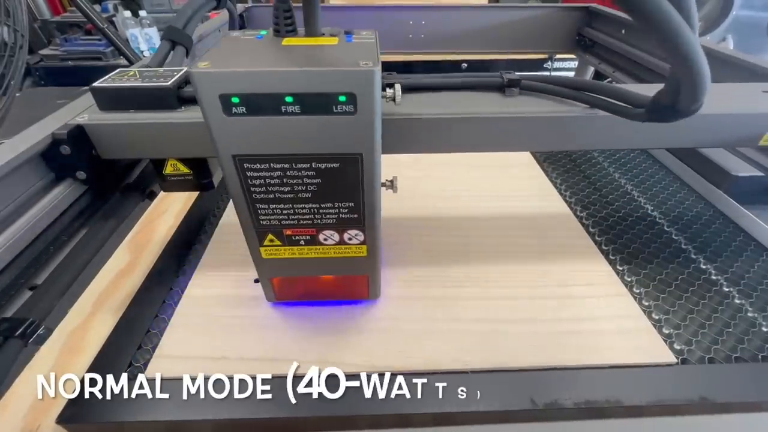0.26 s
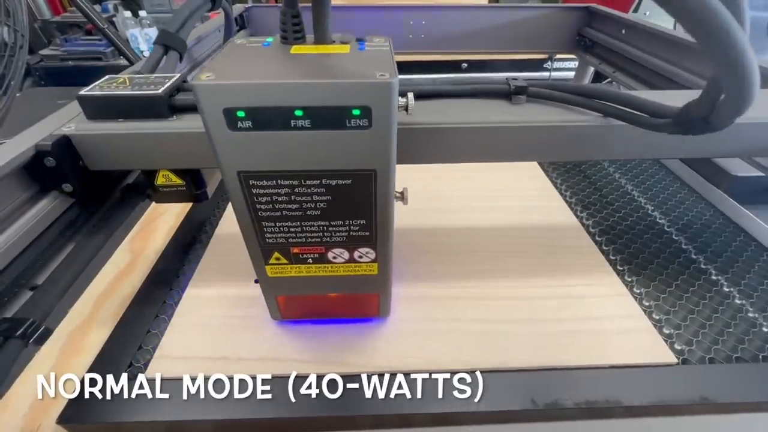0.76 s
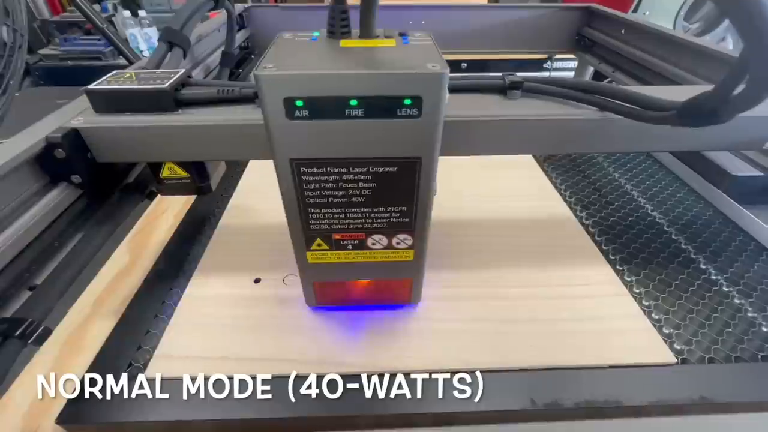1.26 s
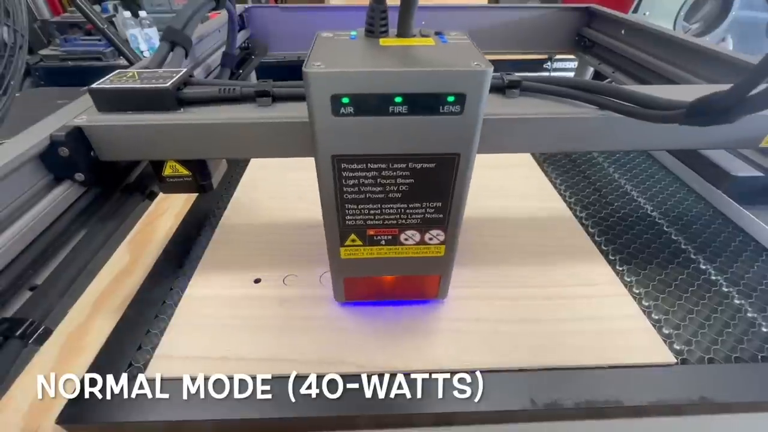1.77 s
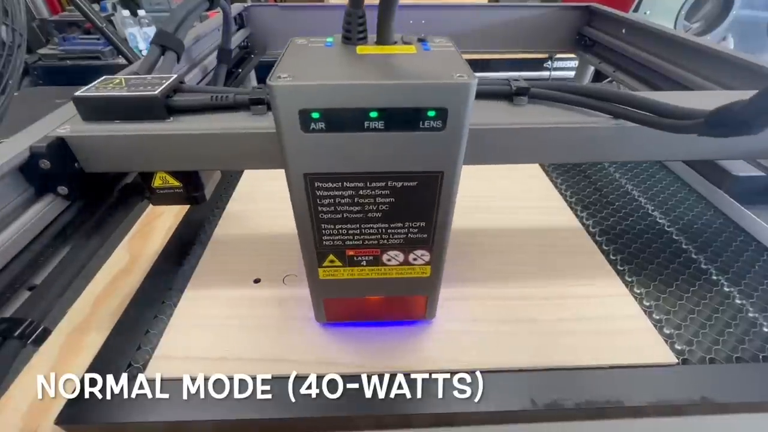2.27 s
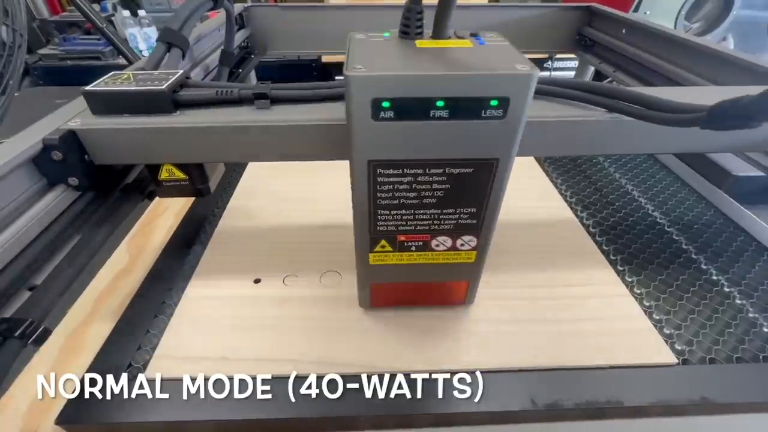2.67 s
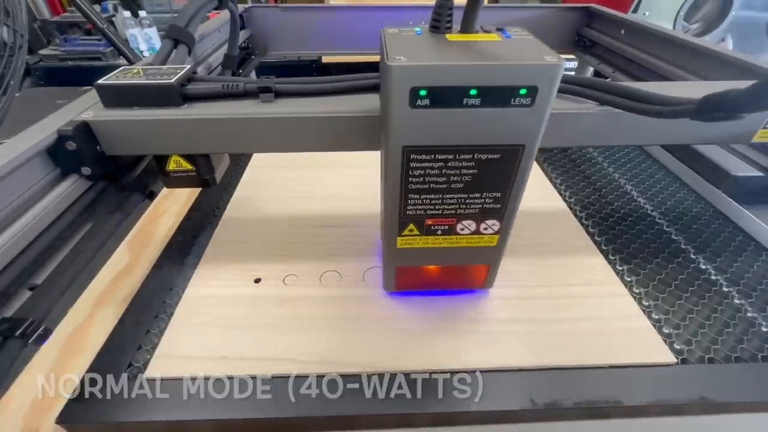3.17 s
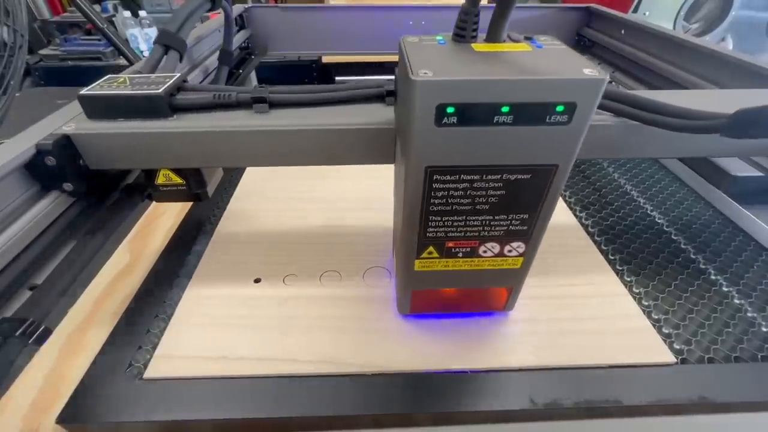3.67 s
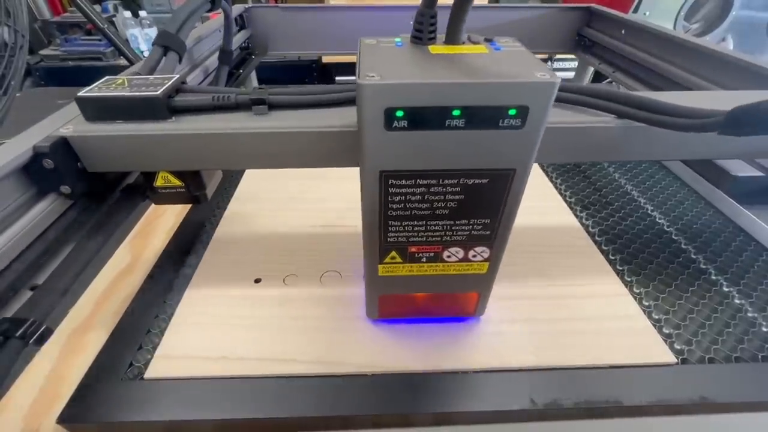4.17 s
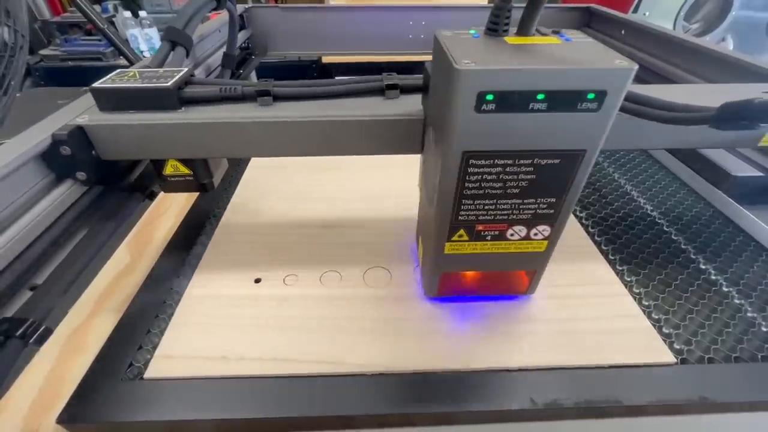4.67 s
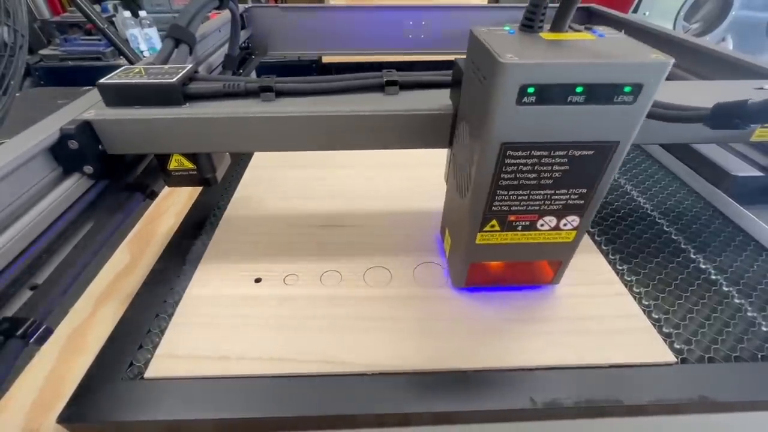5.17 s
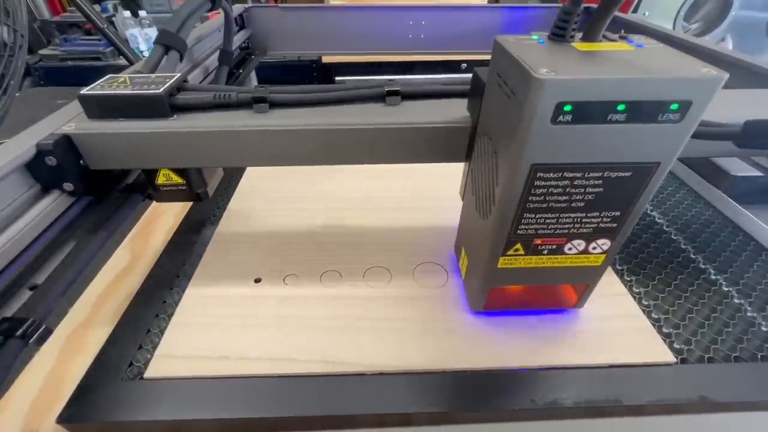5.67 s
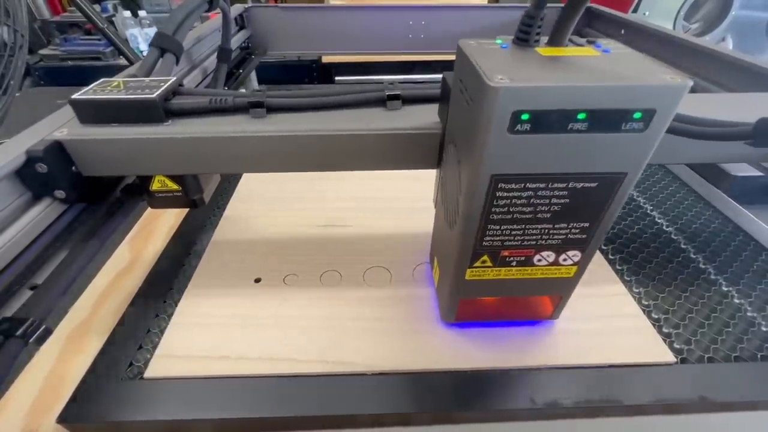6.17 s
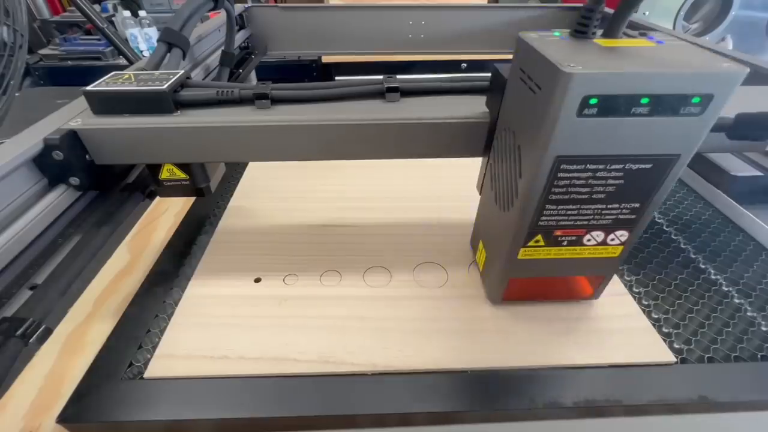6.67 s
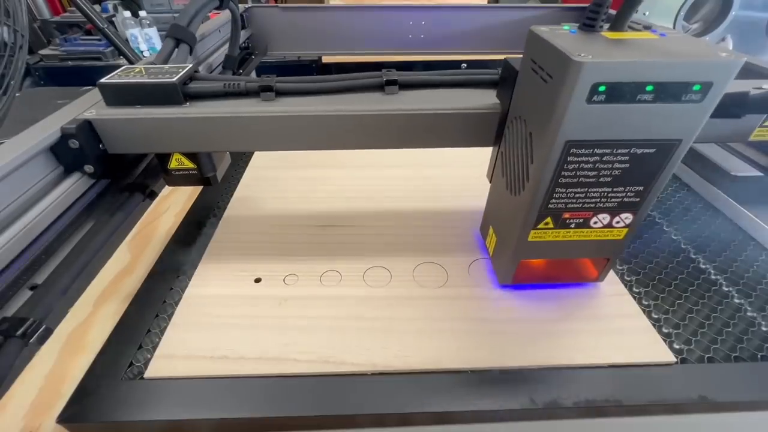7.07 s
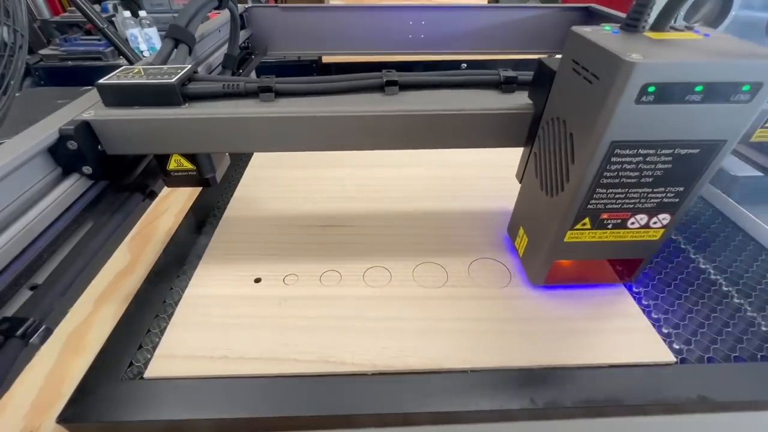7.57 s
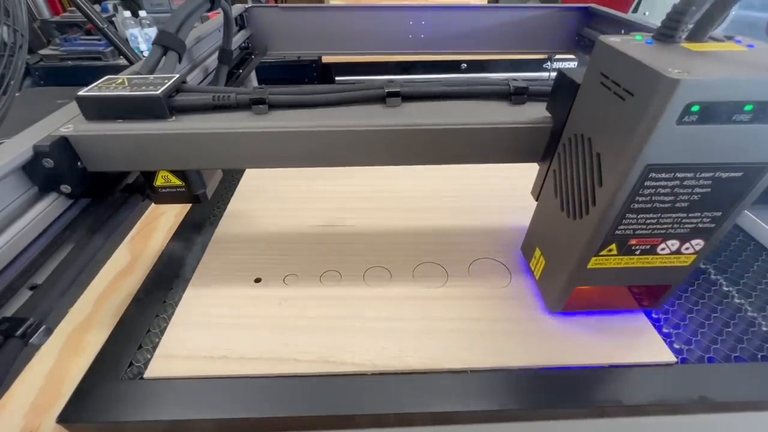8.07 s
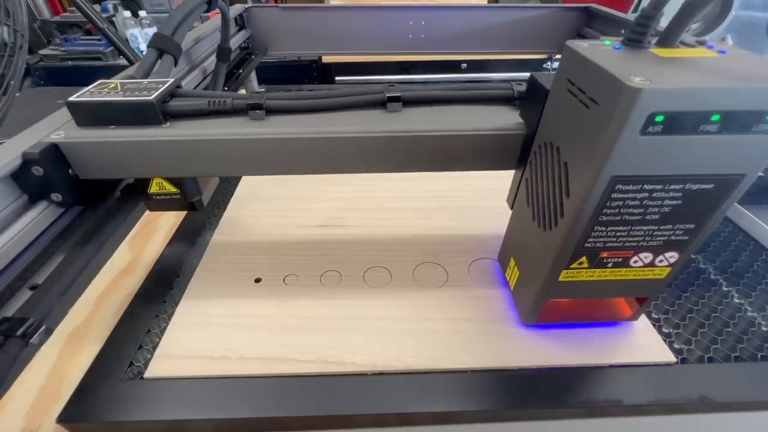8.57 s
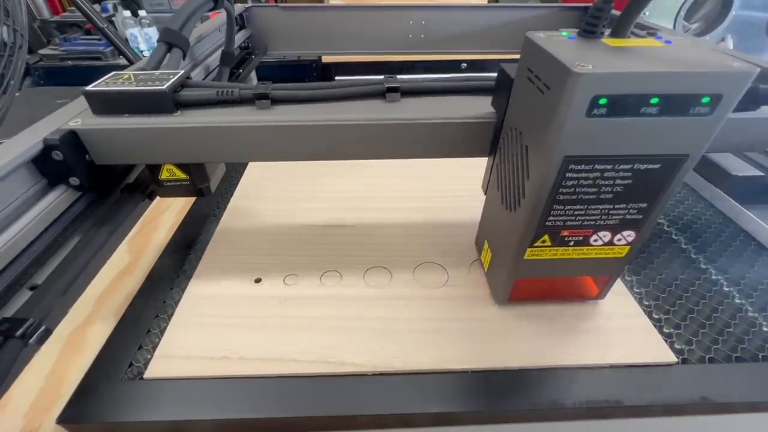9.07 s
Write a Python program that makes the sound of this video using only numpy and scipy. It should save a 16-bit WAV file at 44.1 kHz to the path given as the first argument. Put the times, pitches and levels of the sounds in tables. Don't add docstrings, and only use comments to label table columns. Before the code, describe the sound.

An air nozzle hisses continuously while small cooling fans sing a faint, very high whine that slips upward for a moment at each pause. Fluttering air rumbles and crackles unevenly against the near microphone ports, with sharper puffs clustered around one and a half seconds and scattered later. A weak extractor tone sits far behind in the room. The whine shifts from left toward right and thins out as the head travels.

```python
import sys
import numpy as np
from scipy import signal
from scipy.fft import rfft, irfft, next_fast_len
from scipy.io import wavfile

SR = 44100
rng = np.random.default_rng(int(sys.argv[2]) if len(sys.argv) > 2 else 0)


def materialize(psi):
    bounded = np.clip(np.atleast_2d(psi).T, -1, 1)
    quanta = np.round(bounded * 32767).astype(np.int16)
    wavfile.write(sys.argv[1], SR, quanta)


def volts_from_db(level):
    exponent = np.asarray(level, float) / 20
    return 10 ** exponent


N = 411012

# (time [s], travel [0-1])
HEAD_TRAVEL = [(0, 0), (1.1, .05), (2.5, .25), (3, .5), (4.5, .7), (5.3, .9), (7, .95), (9.32, 1)]
# (start [s], length [s])
BEAM_RESTS = [
    (-.3, .32),
    (1.06, .14),
    (2.55, .13),
    (4.38, .13),
    (6.51, .19),
    (9.05, .4),
]

# (time [s], frequency [Hz])
EXTRACTOR_SPEED = [(0, 1098), (1.2, 1106), (5, 1104), (6.3, 1096), (7.2, 1101), (9.32, 1096)]
# (multiple of blade rate [1], level [dB])
EXTRACTOR_ORDERS = [(.5, -3.5), (1, 2), (1.501, -9.5), (1.75, -12), (2, -13.5), (2.501, -13)]
# (centre [s], change [dB], half length [s])
EXTRACTOR_FADES = [(.25, -4, 0.17), (1.95, -3, 0.58), (5.17, -14, 0.076), (6.1, -13, 0.074),
                   (6.6, -17, 0.089), (9.0, -20, 0.016), (9.3, -10, .08)]

# (frequency [Hz], left [dB per Hz], right [dB per Hz], likeness [0-1], right phase [rad])
HISS_SPECTRUM = [(272, -7, 2, 0.15, 11), (1590, -30, -9.5, 0.15, 8), (2470, -14.5, -13, 1, -12),
                 (3700, -6, -1.5, 0.069, 14), (4500, 6, 7, 0.16, 0.5), (5760, -2, 1.5, 0.2, 7.5),
                 (6520, 11.5, 11, 0.2, -5.5), (6780, 6.5, 7, 0.59, -6.5), (7900, 2, 5.5, .2, 2.4),
                 (9400, 1, 2, .1, 1), (9900, 0, 4, .2, 3), (12100, 5, 2.5, 0.31, 3.5),
                 (12000, -1, 7, .7, 2.5)]
FINE_HISS_SPECTRUM = [(11800, -8, -8, .6, 3.3), (12300, -3, -3, .75, 3.2), (13100, 2, 2, .3, 3.8),
                      (13900, -3, -3, .3, 3.2), (14700, -1, -1, .1, 4.5), (16000, 0, 0, .05, 6.3)]
# (time [s], level [dB])
JET_STRENGTH = [(0, .5), (1.2, 0), (1.8, -0.6), (2.4, -0.9), (3, -0.5), (4.2, -1), (4.8, -0.1), (6, -.3),
                (7.2, -0.3), (8.4, 0.1), (9.32, -0.4)]
BODY_CENTRE_DB, BODY_WIDTH_DB = (-57.5, -55.5), (-57, -58)
FINE_CENTRE_DB, FINE_WIDTH_DB = (-64, -63), (-66, -64)
SHADE_DB = (-6, 1.5)

# (time [s], strength [dB], edge-vortex share [dB])
DRAUGHT_STRENGTH = [(0, -45.5, -10.5), (1, -47, -17), (1.25, -46.5, -7), (1.55, -51.5, -6),
                    (1.75, -45.5, -17), (2.1, -47, -7), (2.35, -48.5, -12), (2.9, -46, -10.5),
                    (4.1, -48, -12), (4.55, -46.5, -13), (5.3, -47, -12), (6.2, -48, -5.5), (6.5, -48, -6),
                    (7.03, -46.5, -11.5), (7.6, -47.5, -7.5), (7.8, -46.5, -17), (8.2, -50, -10.5),
                    (9.32, -46.5, -7)]
# (centre [s], change [dB], half length [s])
LULLS = [(1.37, -12, 0.039), (1.46, -9.5, 0.014), (2.93, -9.5, 0.013), (2.96, 0.5, 0.013), (4.18, 3, 0.07),
         (5.29, -5.5, 0.019), (5.35, 1.5, 0.036), (6.02, -5, 0.024), (6.05, 6.5, 0.014), (6.28, -4, 0.1),
         (6.65, -11.5, 0.048), (6.78, -4.5, 0.2), (8.33, 5, 0.032), (8.9, -7, 0.013), (8.99, -8.5, 0.029),
         (9.14, -3.5, 0.017), (9.24, -2, 0.036)]
# (centre [s], change [dB], half length [s])
VORTEX_CALMS = [(1.37, -24, .11), (2.35, -7, .15), (3.4, -4, .2), (5.42, -8, .08), (5.7, -8, .12),
                (6.15, -7, .12), (6.8, -7, .15), (7.52, -6, .1), (8.25, -7, .08), (8.65, -4, .15),
                (9.15, -8, .05)]
# (time [s], peak [dB], brightness [dB])
SLAPS = [(0.057, -29, -21), (0.256, -34, 7), (0.298, -35, -6), (0.891, -29, -5), (1.218, -27, -8),
         (1.387, -19.5, 7), (1.466, -25, -9), (1.503, -24, 1), (1.594, -22, -15), (1.644, -39, 7),
         (1.729, -28, 2), (2.064, -30, -9), (2.2, -31, -3), (2.453, -21, -27), (2.944, -39, -23),
         (3.774, -31, -12), (4.611, -25, -5), (4.69, -50, -11), (4.938, -28, 1), (5.604, -28, -25),
         (5.963, -29, -14), (6.032, -30, 5), (6.239, -19, -14), (6.314, -27, -15), (7.208, -38, -3),
         (7.339, -30, -17), (8.332, -31, 1), (8.442, -19, -37), (8.539, -23.5, -16), (9.068, -36, -2)]
# (frequency [Hz], left [dB per Hz], right [dB per Hz], likeness [0-1], right phase [rad])
RUMBLE_SPECTRUM = [(20, 8, -5, .4, 20), (60, -15, -23, 0.7, -2), (117, -7.5, -9.5, 0.84, -1.5),
                   (248.5, 2.5, 0, 0.48, -2), (485, -3, -6, 0.22, -2.5), (870, -6.5, -12, 0.22, -2),
                   (1424, -10, -18.5, 0.62, -2), (2200, -17, -30, 0.93, -4.5),
                   (4100, -30.5, -50, 0.4, -1.5)]
SNAP_SPECTRUM = [(300, -39, -13, 0.71, -25), (870, -7, -19, 0.54, -0.5), (1700, -6.5, -12.5, 0.49, -2),
                 (1980, -3, -4, 1, -2.5), (2240, -10, -7.5, 0.89, -4), (3100, -4.5, -7, 1, -4),
                 (4200, -8.5, -12.5, 0.84, -4.5), (5800, -11.5, -13.5, 0.2, -10.5),
                 (8000, -43, -25.5, 0.46, -8.5)]

# (time [s], frequency [Hz])
LOW_SPEED = [(0, 6380), (.56, 6351), (.75, 6386), (.95, 6364), (1.5, 6388), (2.26, 6396), (2.52, 6366),
             (2.85, 6398), (3.1, 6378), (3.86, 6414), (4.8, 6398), (5.14, 6414), (5.31, 6460), (6.45, 6436),
             (7, 6467), (7.4, 6442), (8.25, 6488), (8.95, 6445)]
# (time [s], frequency [Hz])
HIGH_SPEED = [(0, 6615), (.4, 6625), (.7, 6598), (1.76, 6580), (2.02, 6610), (2.32, 6570), (2.5, 6605),
              (2.95, 6588), (3.71, 6601), (4.14, 6563), (4.27, 6594), (4.8, 6585), (5.04, 6605),
              (5.7, 6576), (5.95, 6589), (6.48, 6565), (7, 6597), (8.9, 6574)]
# (time [s], whine [dB], octave [dB])
LOW_HEARD = [(0, -51, -56), (.9, -52, -64), (1.4, -51.5, -59), (2.5, -51, -54), (3.1, -49.5, -69),
             (4.35, -51.5, -74), (4.52, -59, -74), (4.75, -50, -63), (5.14, -54, -64), (5.35, -56, -70),
             (6.098, -65, -67), (6.5, -56, -72), (7, -62.5, -68), (8.5, -60.5, -56), (9.32, -65, -59)]
# (time [s], whine [dB], octave [dB])
HIGH_HEARD = [(0, -64, -59), (.65, -52, -58), (1, -63, -53), (1.36, -62, -54), (1.76, -54, -70),
              (2.05, -57, -60), (3.3, -60, -53), (4.5, -59, -55), (5.1, -64, -67), (5.6, -59, -73),
              (6.27, -54.5, -53), (6.9, -60.5, -73), (7.25, -63, -55), (7.8, -79, -61), (8.5, -70, -62),
              (8.85, -56, -75), (9.32, -57.5, -61)]
REST_SURGE_HZ, FAN_INERTIA_S = 165, 0.042
# left level over right [dB], lag of right behind left [rad]
WHINE_PAN_DB, WHINE_LAG_RAD = (7.5, -4.5), (2.3, 0.078)
LOW_OCTAVE_LAG_RAD, HIGH_OCTAVE_LAG_RAD = (-1.5, -3.5), (-2, -7.5)


def rms_one(x):
    return x / np.sqrt(np.mean(x ** 2) + 1e-20)


def in_time(rows):
    s, *columns = np.transpose(rows)
    return [np.interp(np.arange(N) / SR, s, c) for c in columns]


def bumps(rows):
    t = np.arange(0, N, 32) / SR
    change_db = sum(db * np.exp(-((t - s) / half_s) ** 2) for s, db, half_s in rows)
    return np.interp(np.arange(N) / SR, t, change_db)


def along(ends):
    travel, = in_time(HEAD_TRAVEL)
    return ends[0] + (ends[1] - ends[0]) * travel


def drift(rate_hz):
    r = np.exp(-16 * np.pi * rate_hz / SR)
    slow = signal.lfilter([1], [1, -2 * r, r * r], rng.standard_normal(N // 8 + 6002))[6000:]
    return np.interp(np.arange(N) / 8, np.arange(len(slow)), rms_one(slow - slow.mean()))


def lumpy(gain):
    return gain * rng.standard_normal(N)


def swell(clicks, length_s):
    t = np.arange(round(0.03 * SR)) / SR / length_s
    return signal.oaconvolve(clicks, t * np.exp(1 - t))[:N]


def port_noise(table, shared, own, top_hz=20000):
    size = next_fast_len(N)
    hz = np.maximum(np.arange(size // 2 + 1) * SR / size, 1)
    at, *columns = np.transpose(table)
    left_db, right_db, alike, turn = [np.interp(np.log(hz), np.log(at), c) for c in columns]
    alike = np.clip(alike, 0, 0.99)
    first, second = rfft([shared, own], size)
    right = alike * np.exp(1j * turn) * first + np.sqrt(1 - alike ** 2) * second
    skirt = 1 / (1 + (hz / top_hz) ** 24) * np.minimum(hz / at[0], 1) ** 4
    spectra = np.array([volts_from_db(left_db) * first, volts_from_db(right_db) * right]) * skirt
    return rms_one(irfft(spectra, size)[:, :N])


def placed(pair, centre_db, width_db):
    centre = volts_from_db(centre_db) * (pair[0] + pair[1]) / 2
    width = volts_from_db(width_db) * (pair[0] - pair[1]) / 2
    return np.array([centre + width, centre - width])


def extractor():
    hz, = in_time(EXTRACTOR_SPEED)
    level_db = -65.5 + bumps(EXTRACTOR_FADES)
    phase = 2 * np.pi * np.cumsum(hz + 1.68 * drift(5.3)) / SR
    hum = np.zeros((2, N))
    for multiple, order_db in EXTRACTOR_ORDERS:
        level = volts_from_db(level_db + 6.0 + order_db + 1.7 * drift(7.3))
        hum += level * np.cos([multiple * phase, multiple * phase - 0.6])
    return hum


def nozzle():
    jet_db, = in_time(JET_STRENGTH)
    body = port_noise(HISS_SPECTRUM, lumpy(volts_from_db(0.47 * drift(9.7))), lumpy(volts_from_db(0.94 * drift(27))), top_hz=13000)
    fine = port_noise(FINE_HISS_SPECTRUM, lumpy(volts_from_db(0.67 * drift(9))), lumpy(volts_from_db(0.4 * drift(9))))
    above = signal.butter(4, 14800, "high", fs=SR, output="sos")
    finest = signal.sosfiltfilt(above, fine.mean(axis=0))
    fine = fine + (volts_from_db(along(SHADE_DB)) - 1) * finest
    body = placed(body, along(BODY_CENTRE_DB) + jet_db, along(BODY_WIDTH_DB) + jet_db)
    fine = placed(fine, along(FINE_CENTRE_DB) + 4.2 * jet_db, along(FINE_WIDTH_DB) + jet_db)
    return volts_from_db(6.5) * body + volts_from_db(9.5) * fine


def slaps(brightness):
    at, peak_db, bright_db = np.transpose(SLAPS)
    clicks = np.zeros(N)
    clicks[(at * SR).astype(int)] = volts_from_db(peak_db + 22.5 + brightness * (bright_db + 8))
    return clicks


def draught():
    lull_db = bumps(LULLS)
    strength_db, vortex_db = in_time(DRAUGHT_STRENGTH)
    strength_db = strength_db + lull_db
    vortex_db = vortex_db + bumps(VORTEX_CALMS) + 0.8 * drift(1.6) - 0.1 * lull_db
    eddy = 1.7 * np.tanh((0.85 * drift(60) + 0.45 * drift(160)) / 1.7)
    tick_happens = rng.random(N) < 90 * volts_from_db(3.0 * eddy) / SR
    ticks = tick_happens * volts_from_db(4.34 * np.minimum(rng.exponential(1, N), 2))
    dull, bright = slaps(brightness=0), slaps(brightness=0.75)
    left = lumpy(volts_from_db(3.5 * eddy + 1.8 * drift(78)) + swell(1.0 * dull + 0.25 * ticks, 0.0012))
    right = lumpy(volts_from_db(1.24 * eddy + 1.26 * drift(86)) + swell(0.42 * dull, 0.0015))
    snap = volts_from_db(2.0 * eddy + 4.3 * drift(110)) + swell(11.0 * bright + 1.4 * ticks, 0.00053)
    lead = round(0.001053 * SR)
    rumble = port_noise(RUMBLE_SPECTRUM, left + 60 * np.roll(dull, lead), right)
    snaps = port_noise(SNAP_SPECTRUM, lumpy(snap) + 45 * np.roll(bright, lead), lumpy(snap))
    air = volts_from_db(6.5) * rumble + volts_from_db(-3.0 + 0.44 * (vortex_db + 12.0)) * snaps
    return volts_from_db(strength_db) * air


def sides(pan_db):
    return volts_from_db(np.array([pan_db / 2, -pan_db / 2]))


def surge():
    t = np.arange(-SR, N) / SR
    resting = sum((t > s) & (t < s + length_s) for s, length_s in BEAM_RESTS)
    r = np.exp(-1 / (FAN_INERTIA_S * SR))
    return signal.lfilter([(1 - r) ** 2], [1, -2 * r, r * r], resting)[SR:]


def fan(speed, heard, octave_lag, rest_db, wobble_hz, flutter_db, octave_trim_db):
    hz, = in_time(speed)
    whine_db, octave_db = in_time(heard)
    free = surge()
    lag = along(WHINE_LAG_RAD)
    phase = 2 * np.pi * np.cumsum(hz + REST_SURGE_HZ * free + wobble_hz * drift(22.7)) / SR
    whine_level = volts_from_db(whine_db + along(rest_db) * free + flutter_db * drift(44))
    whine = whine_level * sides(along(WHINE_PAN_DB)) * np.cos([phase, phase - lag])
    octave_level = volts_from_db(octave_db + octave_trim_db + flutter_db * drift(30))
    octave = octave_level * np.cos([2 * phase, 2 * phase - along(octave_lag)])
    return volts_from_db(1.0) * whine + octave


def cooling_fans():
    low = fan(LOW_SPEED, LOW_HEARD, LOW_OCTAVE_LAG_RAD,
              rest_db=(-12, 3.0), wobble_hz=5.66, flutter_db=3.0, octave_trim_db=-1.5)
    high = fan(HIGH_SPEED, HIGH_HEARD, HIGH_OCTAVE_LAG_RAD,
               rest_db=(3.0, 4.0), wobble_hz=4.5, flutter_db=2.0, octave_trim_db=-1.5)
    return low + high


def scene():
    return extractor() + nozzle() + draught() + cooling_fans()


def top_cut(x):
    return signal.sosfilt(signal.butter(12, 15760, fs=SR, output="sos"), x)


def record(dry):
    wind_filter = signal.butter(2, 186, "high", fs=SR, output="sos")
    cut = signal.sosfilt(wind_filter, dry)
    cut = 0.08 * np.tanh(cut / 0.08)
    cut = signal.lfilter(*signal.butter(1, 150, "high", fs=SR), cut)
    null_hz, null_width_hz = 2420, 750
    null_filter = signal.iirpeak(null_hz, null_hz / null_width_hz, fs=SR)
    band = signal.lfilter(*null_filter, cut.mean(axis=0))
    cancel = 1 - 0.66 * volts_from_db(0.7 * bumps(VORTEX_CALMS))
    return top_cut(cut - cancel * band)


dry = scene()
out = record(dry)
materialize(out)
```